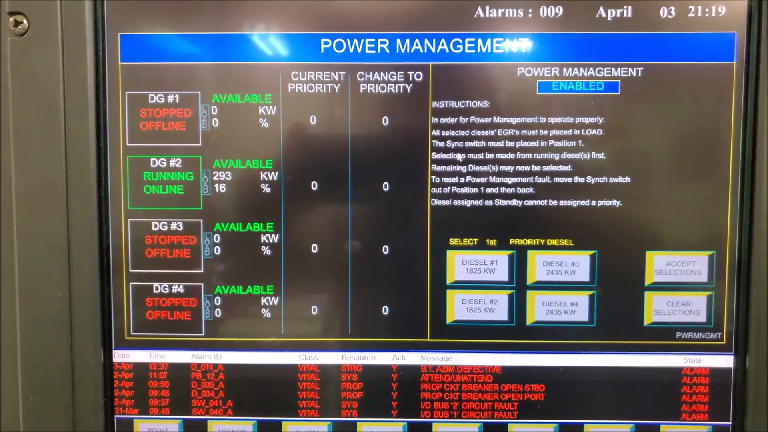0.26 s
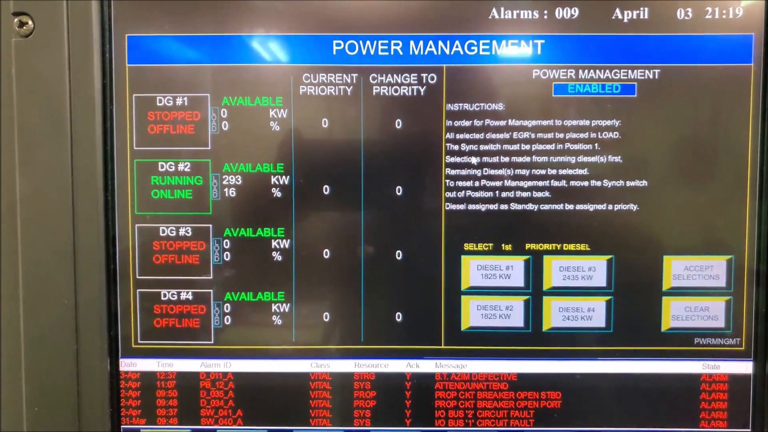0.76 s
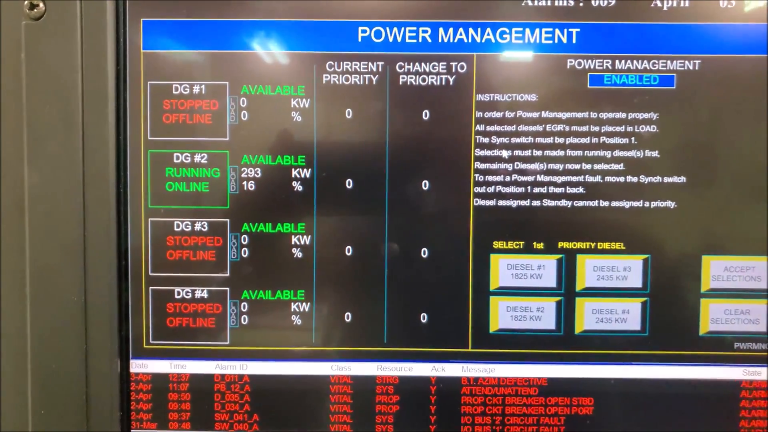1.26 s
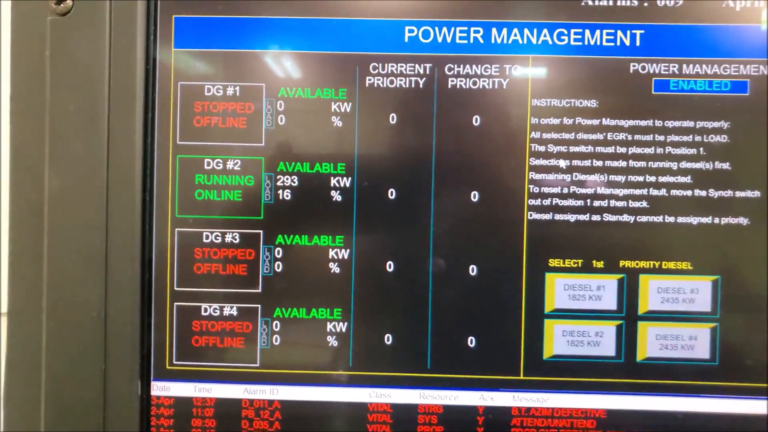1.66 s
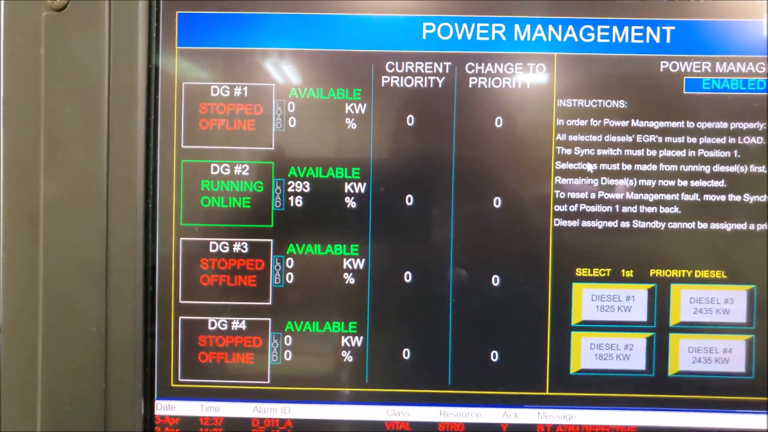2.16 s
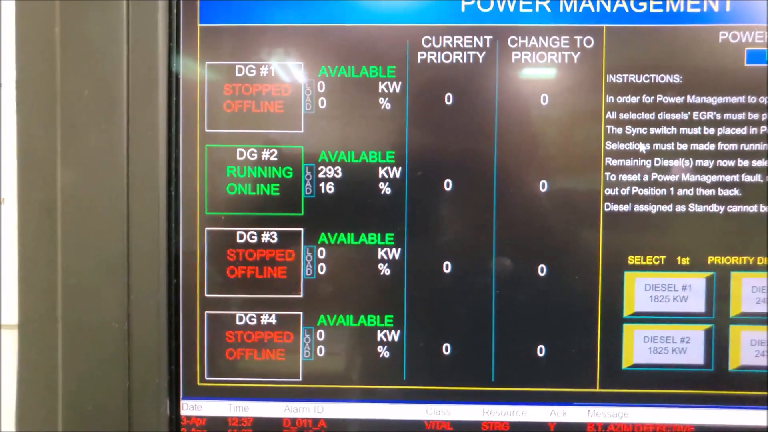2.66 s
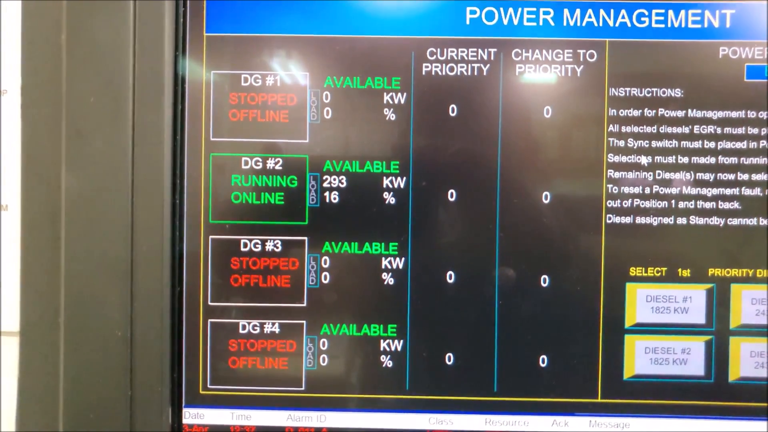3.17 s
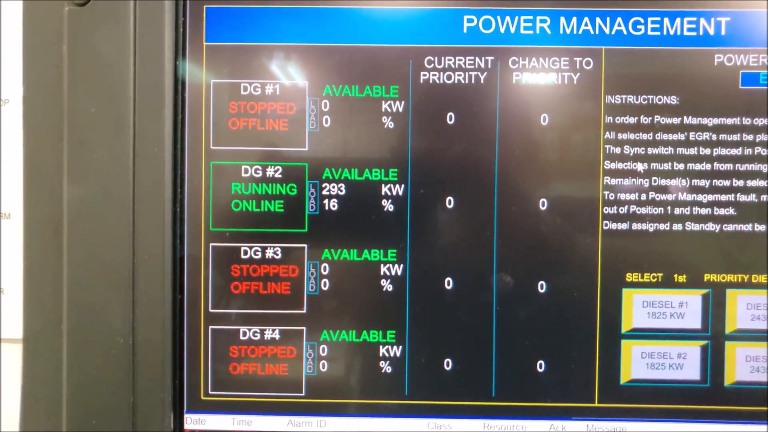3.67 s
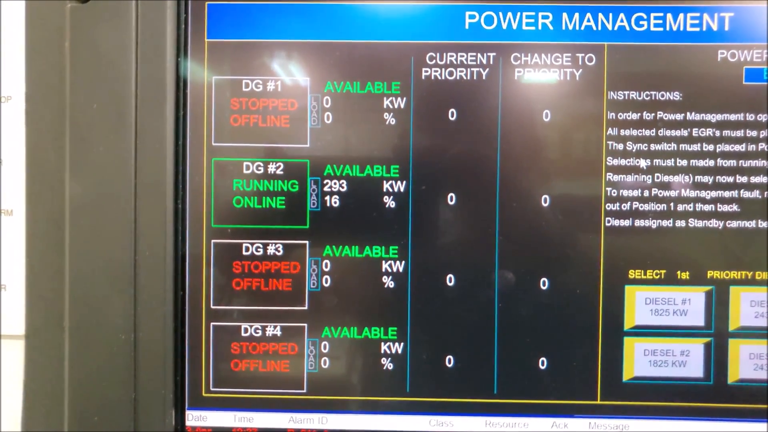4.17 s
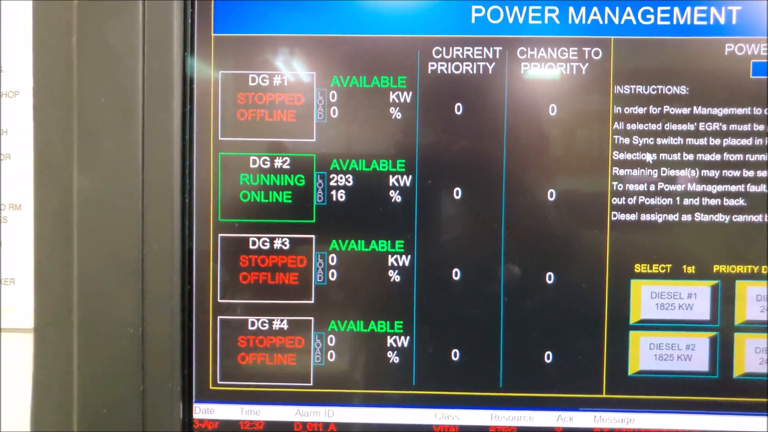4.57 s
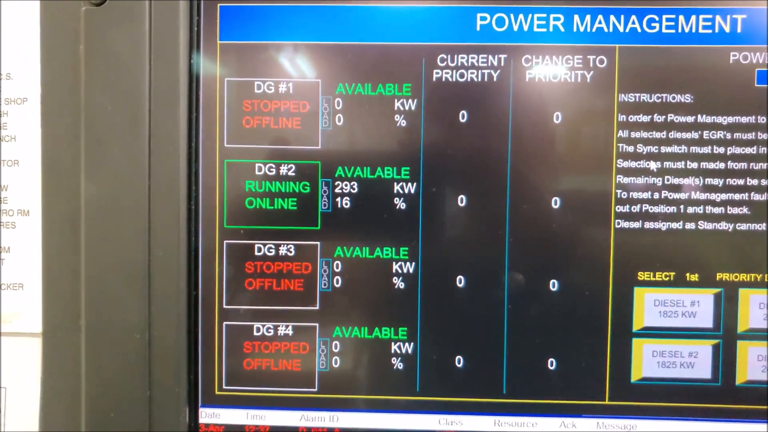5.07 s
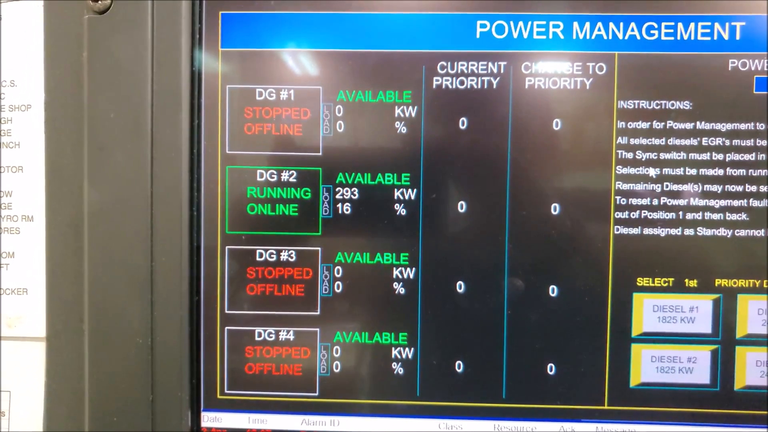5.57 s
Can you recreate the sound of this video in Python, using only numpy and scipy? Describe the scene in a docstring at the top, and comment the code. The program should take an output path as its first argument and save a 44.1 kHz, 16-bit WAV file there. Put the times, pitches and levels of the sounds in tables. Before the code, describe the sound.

After a split second of silence, very faint machinery sound begins in a ship's switchboard room. One soft, dull bump knocks at about 1.2 seconds while the sound swells. By three seconds a diesel generator's low throbbing drone is at full level, heard through bulkheads, with mains hum, fan tones, airy duct noise and a thin wavering electronic whine, all holding steady to the end. Wide, enveloping stereo with centred bass.

```python
"""After 0.14 s of silence, a faint machinery drone that swells to full level by about 3 s, one dull bump on the way.
A ship's diesel generator at 900 rpm, heard through the bulkheads of the switchboard room: tones at
multiples of shaft speed throb with the mains hum. Fans and pumps add tones at their own speeds,
the ducts shaped noise, the motor drive a wavering whine with partials and hiss."""
import sys
import numpy as np
from scipy import signal
from scipy.fft import rfft, irfft
from scipy.io import wavfile

SR = 44100
rng = np.random.default_rng(int(sys.argv[2]) if len(sys.argv) > 2 else 0)


def wav_record(signal):
    """Record a signal, one row per channel, as 16-bit PCM in the file named by sys.argv[1]."""
    frames = np.transpose(np.atleast_2d(signal))
    bounded = np.clip(frames, -1, 1)
    # unit amplitude maps onto the largest positive 16-bit level
    quanta = np.round(bounded * 32767).astype(np.int16)
    wavfile.write(sys.argv[1], SR, quanta)


N = 257103
TIME_S = np.arange(N) / SR
FREQS_HZ = np.maximum(np.fft.rfftfreq(N, 1 / SR), 1)

# Machine levels are those ahead of the swell; left-right is positive to the left.
# duct air: (frequency [Hz], density [dB per Hz])
AIR_SPECTRUM = [(100, -93), (450, -73), (580, -76), (720, -72.5), (900, -77.5), (1800, -77), (2550, -87),
                (3300, -86.5), (3900, -85), (5200, -94), (7400, -101), (9500, -100), (12300, -89.5),
                (14400, -99.5)]
# hull rumble: (frequency [Hz], density [dB per Hz])
RUMBLE_SPECTRUM = [(18, -87), (28, -84), (50, -50.5), (88, -48.5), (100, -55), (135, -51.5), (175, -54),
                   (240, -60.5), (268, -69.5), (330, -66.5), (385, -76.5), (470, -70.5), (560, -80.5),
                   (1500, -110)]
# placement of noise: (frequency [Hz], left-right [dB])
NOISE_BALANCE = [(200, 0), (720, -0.5), (900, -3.5), (1400, -5), (2000, -9), (2800, -4), (3900, -3.5),
                 (5200, -4.5), (7400, -2), (8600, -8), (10500, -0.5), (12500, -6), (14300, 0)]
# correlation of the two sides, diffuse above the bass: (frequency [Hz], likeness [-1 to 1])
SIDE_LIKENESS = [(40, 0.9), (110, 0.94), (230, 0.95), (290, 0.59), (480, 0.82), (760, 0.25), (1100, -0.014),
                 (1900, 0.059), (4000, 0.022), (14000, 0.14)]
# fans and pumps on induction motors: (frequency [Hz], level [dB], left-right [dB])
MOTOR_TONES = [(28.1, -47, 0), (54.4, -43, -1), (85.3, -40, 1), (101.7, -42, 2), (140.8, -49, 0),
               (231.3, -49, 0), (232.4, -44.5, 0), (281.1, -47.5, -2), (329, -59, -5), (511.4, -58, 0),
               (1694.4, -60.5, -19), (1777.8, -67, -22), (3501, -75, -8), (3755, -76, -6)]
# switchboard hum and buzz: (multiple of mains [1], level [dB], left-right [dB])
MAINS_HUM = [(1, -39, -7), (4, -44, -2.5), (6, -71, -1), (10, -66.5, -1), (12, -63, -1), (18, -62.5, -9),
             (22, -78, 9), (24, -68, -4), (26, -69.5, -13)]
# upper partials and sidebands of the drive, near the panel: (frequency [Hz], level [dB], left-right [dB])
WHINE_PARTIALS = [(5873, -74, -1), (5916, -67, -17), (8832, -77, -7), (8877, -83, -13), (11389, -73, -3),
                  (11749, -69, -11), (11868, -63, -6), (12481, -79, -18), (13674, -75, -7)]
# hiss skirts, ahead of the comb: (multiple of switching rate [1], half-amplitude width [Hz], peak [dB per Hz])
SWITCHING_SKIRTS = [(1, 185, -87.5), (2, 820, -94.5), (3, 810, -99.5), (4, 720, -88.5)]
# main whine tone, apart from the swell: (time [s], level [dB])
WHINE_LEVEL_CURVE = [(.3, -50.5), (1.03, -61), (1.5, -51.5), (2.15, -58.5), (2.75, -51), (3.05, -56),
                     (4.4, -52), (4.85, -58)]
# bump resonances, ahead of its band filter: (frequency [Hz], level re BUMP_DB [dB], t60 [s])
BUMP_RINGS = [(93, 3, 0.14), (151, -2, 0.034), (228, 1, 0.0296)]
# engine orders in the steelwork: (multiple of shaft speed [1], level [dB])
ENGINE_ORDERS = [(3, -33), (5.5, -48.5), (7.5, -45), (11, -47.5), (15, -54)]
# main drone: (multiple of shaft speed [1], level [dB])
DRONE_ORDERS = [(5, -51), (6, -44), (7, -28.7), (8, -33.6)]

SHAFT_HZ = 14.997
MAINS_HZ = 4 * SHAFT_HZ  # eight-pole alternator: four mains cycles per turn
THROB_S = 3.008  # one moment when the drone's tones crest together
SWITCHING_HZ, DRIVE_OUTPUT_HZ = 2958.4, 45.0
# upper partials are beamed and grow as the listener nears the panel
APPROACH_START_S, APPROACH_END_S = 1.8, 2.3
FAR_DB, NEAR_DB = -3.8, 0
BUMP_S, BUMP_DB = 1.234, -24
BASS_START_S, BASS_RISE_S = 0.89, 2.2
TREBLE_START_S, TREBLE_RISE_S = 0.93, 2.08
BASS_FAINT_DB, BASS_FULL_DB = -27.8, -0.15
TREBLE_FAINT_DB, TREBLE_FULL_DB = -30, -0.9
START_S, OPENING_S = 0.14, 0.0021
CUTOFF_HZ = 14450


def from_db(db):
    """Decibels to amplitude gain."""
    return 10 ** (np.asarray(db) / 20)


def at_hz(points, hz):
    """Table read on a log-frequency axis."""
    table_hz, value = np.transpose(points)
    return np.interp(np.log(hz), np.log(table_hz), value)


def drift(rate_hz):
    """Slow random signal of zero mean and unit spread: two-pole low-passed noise."""
    step, settle = 100, 2000  # drawn every 100 samples; filter start-up dropped
    pole = np.exp(-2 * np.pi * rate_hz * step / SR)
    noise = rng.standard_normal(N // step + settle + 2)
    slow = signal.lfilter([1], [1, -2 * pole, pole ** 2], noise)[settle:]
    slow = (slow - slow.mean()) / slow.std()
    return np.interp(np.arange(N) / step, np.arange(len(slow)), slow)


def pan(balance_db):
    """Left and right gains that keep the mean power."""
    gains = from_db(np.array([[1], [-1]]) * balance_db / 2)
    return gains / np.sqrt(np.mean(gains ** 2, axis=0))


def room_noise(density_db, ripple_db):
    """Shaped stereo noise, rippled by room modes above 300 Hz, its sides correlated by frequency."""
    mid, side = rfft(rng.standard_normal((2, N)))
    alike = at_hz(SIDE_LIKENESS, FREQS_HZ)
    pair = np.sqrt(1 + alike) * mid + np.sqrt(1 - alike) * side * [[1], [-1]]
    knots_hz = np.arange(300, SR / 2, 14)
    ripple = ripple_db * np.interp(FREQS_HZ, knots_hz, rng.standard_normal(len(knots_hz)), left=0)
    gain = pan(at_hz(NOISE_BALANCE, FREQS_HZ)) * from_db(density_db + ripple)
    return irfft(pair * gain * np.sqrt(SR) / 2, N)


def room_tone(hz, level_db, balance_db, scatter, rate_hz, crest_s=None):
    """Steady tone plus drifting reflections; short waves reach the two sides out of step."""
    alike = at_hz(SIDE_LIKENESS, hz)
    mid = drift(rate_hz) + 1j * drift(rate_hz)
    side = drift(rate_hz) + 1j * drift(rate_hz)
    pair = np.sqrt((1 + alike) / 2) * mid + np.sqrt((1 - alike) / 2) * side * [[1], [-1]]
    reflections = scatter * pair
    side_phase = np.exp(0.5j * np.arccos(alike) * np.array([[1], [-1]]))
    origin_s = rng.random() if crest_s is None else crest_s
    wave = np.exp(2j * np.pi * hz * (TIME_S - origin_s))
    # level_db is RMS, reflections included
    gain = from_db(level_db) * pan(balance_db) * np.sqrt(2 / (1 + 2 * scatter ** 2))
    return gain * np.real((1 + reflections) * side_phase * wave)


def ventilation():
    """Air rushing from the ducts: broadband noise, almost steady."""
    return room_noise(at_hz(AIR_SPECTRUM, FREQS_HZ), ripple_db=1.15) * from_db(0.092 * drift(8.9))


def motors():
    """Fans and pumps each turn at a speed of their own, giving fixed tones."""
    return sum(room_tone(hz, db, side_db, scatter=0.27, rate_hz=1.22)
               for hz, db, side_db in MOTOR_TONES)


def switchboard():
    """Iron cores hum at multiples of the mains rate."""
    return sum(room_tone(multiple * MAINS_HZ, db, side_db, scatter=0.19, rate_hz=0.89)
               for multiple, db, side_db in MAINS_HUM)


def electronics():
    """Motor drive: shimmering upper partials, and hiss skirts round multiples of the switching rate."""
    partials = sum(room_tone(hz, db, side_db, scatter=0.33, rate_hz=5.5)
                   for hz, db, side_db in WHINE_PARTIALS)
    nearness_db = np.interp(TIME_S, [APPROACH_START_S, APPROACH_END_S], [FAR_DB, NEAR_DB])
    skirts = 0
    for multiple, width_hz, db in SWITCHING_SKIRTS:
        offset_hz = FREQS_HZ - multiple * SWITCHING_HZ
        # the drive's output frequency combs each skirt into faint sidebands
        comb = 1 + 1.1 * abs(np.cos(np.pi * offset_hz / DRIVE_OUTPUT_HZ)) ** 20
        skirts = skirts + comb * from_db(db) / (1 + (2 * offset_hz / width_hz) ** 2)
    hiss = room_noise(20 * np.log10(skirts), ripple_db=1.5)
    return partials * from_db(nearness_db) + hiss


def whine():
    """The drive's clean tone at its switching rate, waxing and waning slowly."""
    level_db = np.interp(TIME_S, *np.transpose(WHINE_LEVEL_CURVE))
    return room_tone(SWITCHING_HZ, level_db, balance_db=-3.5, scatter=0.096, rate_hz=2.8)


def bump():
    """A soft knock rings a few low, well-damped modes, then band-limited."""
    age_s = np.maximum(TIME_S - BUMP_S, 0)
    rings = 0
    for hz, db, t60_s in BUMP_RINGS:
        envelope = from_db(BUMP_DB + db - 60 * age_s / t60_s)
        rings = rings - envelope * np.sin(2 * np.pi * hz * age_s)
    band = signal.butter(2, [45, 270], "band", fs=SR, output="sos")
    return signal.sosfilt(band, rings)


def diesel():
    """A four-stroke gives whole and half orders over the wavering rumble of the hull."""
    orders = sum(room_tone(order * SHAFT_HZ, db, 0, scatter=0.12, rate_hz=1.6)
                 for order, db in ENGINE_ORDERS)
    rumble = room_noise(at_hz(RUMBLE_SPECTRUM, FREQS_HZ), ripple_db=1.0)
    return orders + rumble * from_db(0.63 * drift(6.2))


def drone():
    """Neighbouring orders, with alternator hum on the eighth, sum to one throb per shaft turn."""
    return sum(room_tone(order * SHAFT_HZ, db, 0, scatter=0.027, rate_hz=0.7, crest_s=THROB_S)
               for order, db in DRONE_ORDERS)


def fade_in(faint_db, full_db, start_s, rise_s):
    """Gain: faint hold, quarter-sine rise, full hold."""
    risen = np.sin(np.pi / 2 * np.clip((TIME_S - start_s) / rise_s, 0, 1))
    return (1 - risen) * from_db(faint_db) + risen * from_db(full_db)


def swell(x, bass_hz):
    """Bass and treble rise on separate curves, the bass starting first."""
    bass = irfft(rfft(x) / (1 + (FREQS_HZ / bass_hz) ** 4), N)
    treble = x - bass
    bass_gain = fade_in(BASS_FAINT_DB, BASS_FULL_DB, BASS_START_S, BASS_RISE_S)
    treble_gain = fade_in(TREBLE_FAINT_DB, TREBLE_FULL_DB, TREBLE_START_S, TREBLE_RISE_S)
    return bass * bass_gain + treble * treble_gain


def scene():
    """All machines run throughout and swell in; the bump stands outside the swell."""
    background = ventilation() + motors() + switchboard() + electronics() + whine()
    machinery = background + diesel() + drone()
    return swell(machinery, bass_hz=330) + bump()


def record(dry):
    """Sound sets in after a moment of silence; a steep low-pass cuts the top."""
    opened = np.clip((TIME_S - START_S) / OPENING_S, 0, 1)
    low_pass = signal.ellip(10, 0.1, 90, CUTOFF_HZ, fs=SR, output="sos")
    return signal.sosfilt(low_pass, dry * opened)


dry = scene()
out = record(dry)
wav_record(out)
```